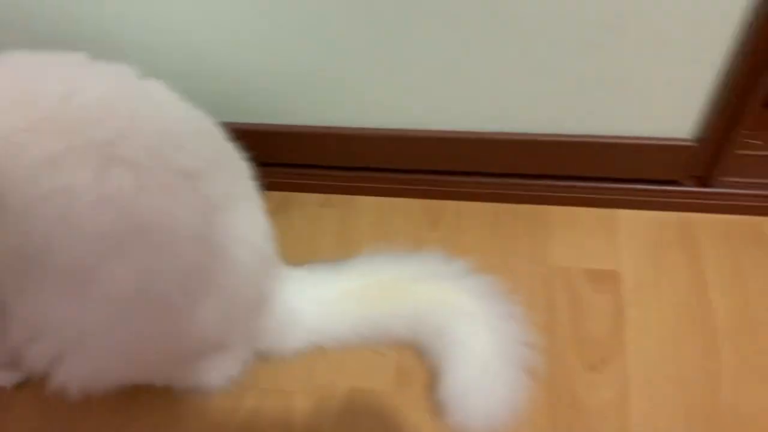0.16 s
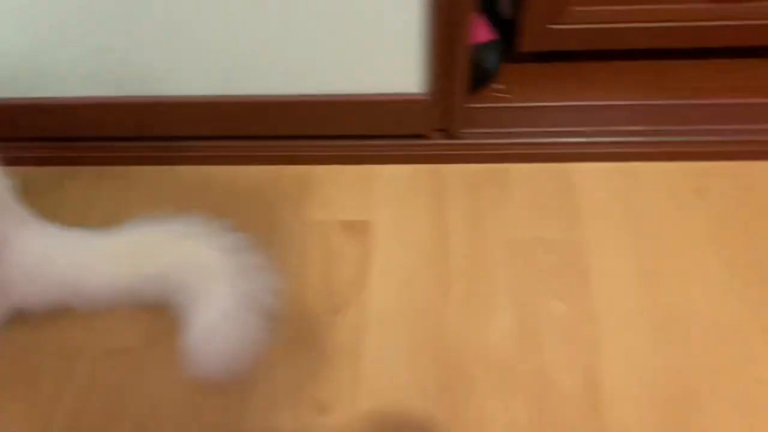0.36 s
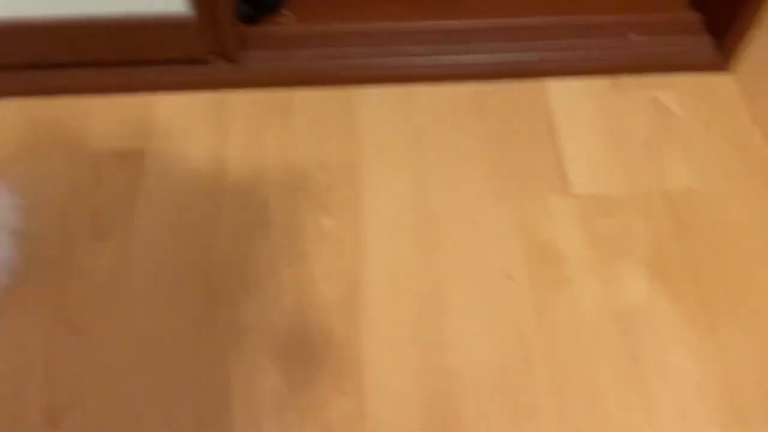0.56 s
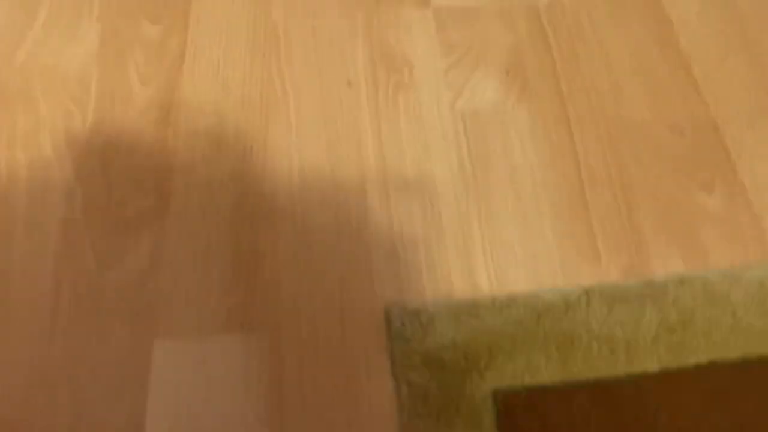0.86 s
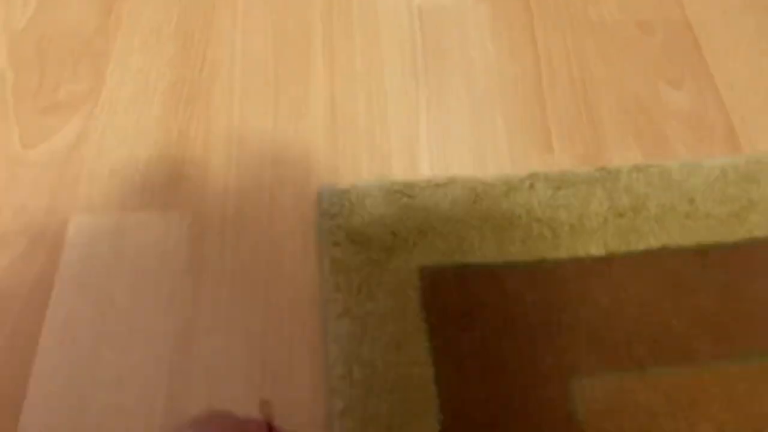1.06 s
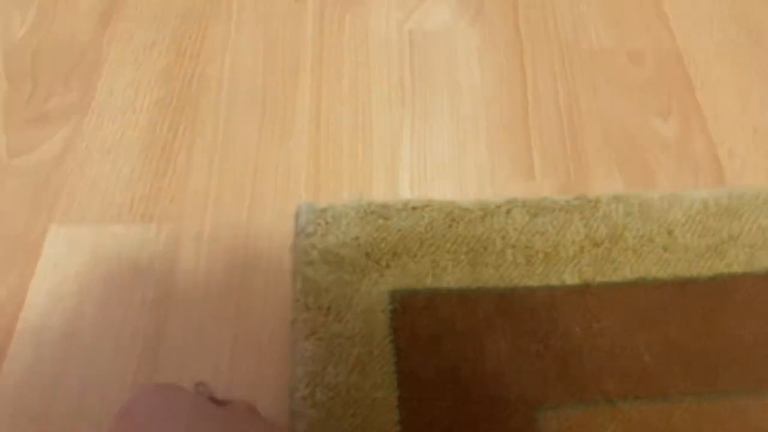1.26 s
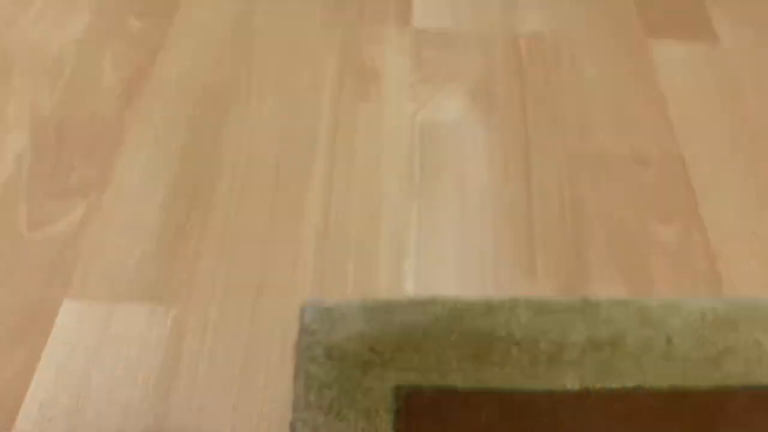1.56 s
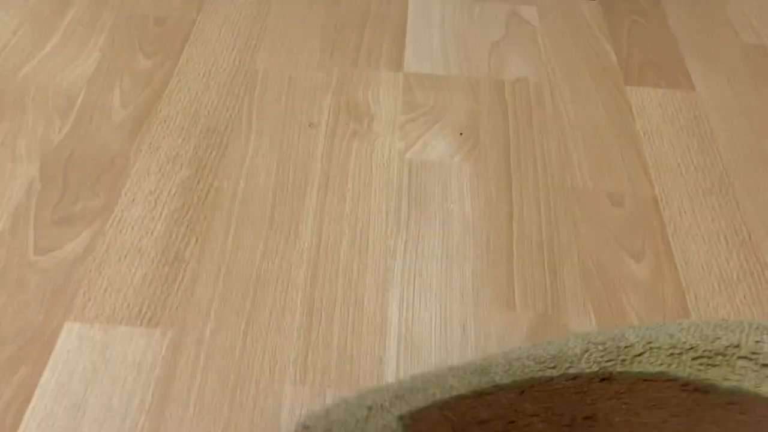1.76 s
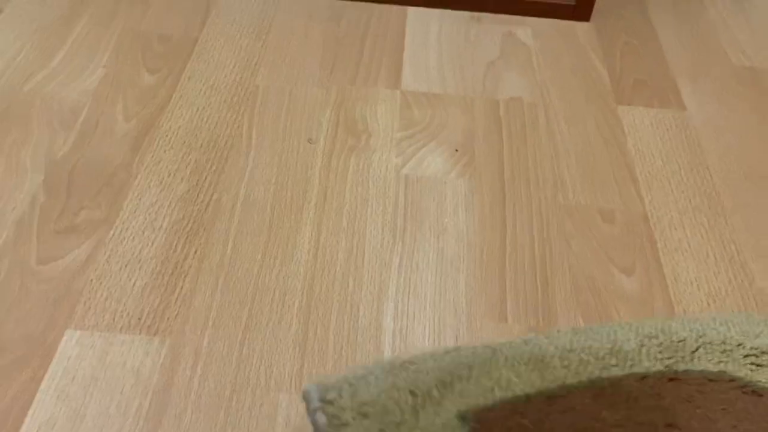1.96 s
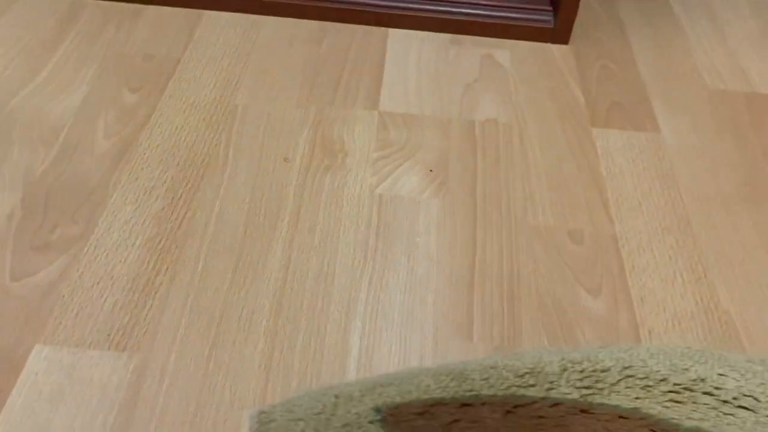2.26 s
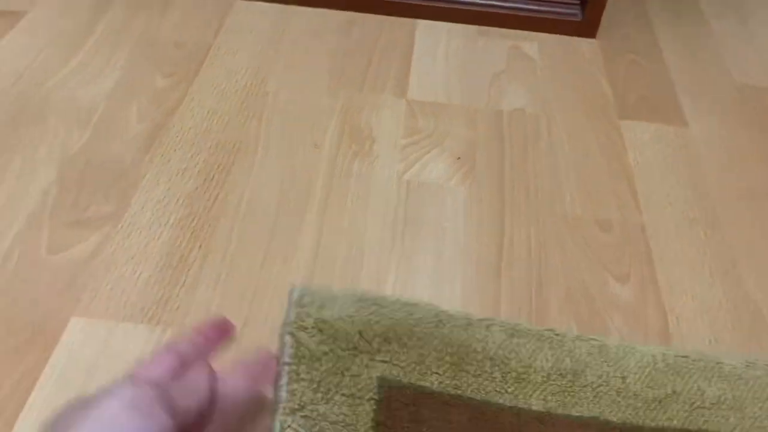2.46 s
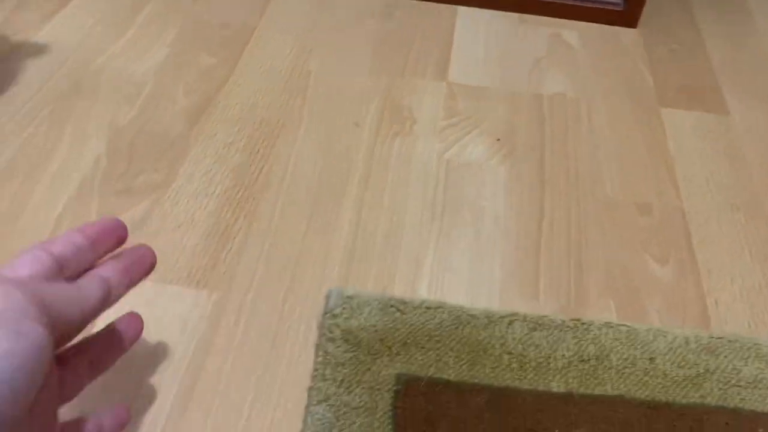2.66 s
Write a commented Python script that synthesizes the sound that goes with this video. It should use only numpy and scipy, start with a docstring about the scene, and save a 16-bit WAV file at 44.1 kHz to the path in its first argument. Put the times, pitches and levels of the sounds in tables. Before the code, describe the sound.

A small metal pin clicks on a laminate floor, amid soft low footfalls, cloth rustle and light board taps; later it bounces in a quick cluster before one dull thump, close microphone, small quiet room.

```python
"""Cloth rustles and soft footfalls thud near the microphone in a small room, with board taps and a foot scuff.
A small metal pin is batted about on a laminate floor: it clicks, bounces and skitters; one dull thump comes late.
Each contact bends the boards, which answer with a short falling chirp: bending waves carry treble fastest.
Clicks, cloth and air are shaped noise, footfalls are slow pulses, rings are decaying sines;
the room adds diffuse echoes that die at a different rate in each band."""
import sys
import numpy as np
from scipy import signal
from scipy.fft import rfft, irfft, next_fast_len
from scipy.io import wavfile

SR = 44100
rng = np.random.default_rng(int(sys.argv[2]) if len(sys.argv) > 2 else 0)


def dump(signal):
    """Clip the signal to [-1, 1] and save it as 16-bit WAV at the path in sys.argv[1]."""
    limited = np.clip(np.atleast_2d(signal).T, -1, 1)
    pcm = np.round(limited * 32767).astype(np.int16)
    wavfile.write(sys.argv[1], SR, pcm)


N = 123479  # length in samples
TIME = np.arange(N) / SR  # s from the start of the scene
AGE = np.arange(int(.25 * SR)) / SR  # s from the onset of one contact

# Rustle of clothing. Each row: time in seconds, level in dB before the grain.
RUSTLE_LEVEL = [(0, -70.5), (0.2, -72.5), (0.42, -82.5), (0.435, -59), (0.54, -65), (0.61, -53),
                (0.69, -81), (0.85, -67.5), (1.05, -65.5), (1.25, -84.5), (1.44, -61), (1.52, -66),
                (1.6, -55), (1.69, -64.5), (1.74, -75.5), (1.775, -65), (1.81, -79), (1.87, -77.5),
                (1.92, -60), (2.0, -63.5), (2.07, -55.5), (2.3, -59), (2.41, -62), (2.46, -74), (2.68, -83),
                (2.73, -72), (2.8, -66.5)]
# Spectrum of the cloth hiss. Each row: frequency in Hz, relative level in dB.
RUSTLE_COLOUR = [(100, -14.5), (300, -3), (700, 2), (1300, -2.5), (2400, -2), (4000, -4), (6500, -5.5),
                 (8500, -7.5), (11000, -8.5), (16000, -13)]
RUSTLE_GRAIN_DB, RUSTLE_GRAIN_S = 2.5, 0.0048  # spread and spacing of the random level points

# Spectrum of the still air. Each row: frequency in Hz, relative level in dB.
AIR_COLOUR = [(30, 0.5), (120, 15), (500, 7.5), (1000, -31.5), (3000, -27.5), (8000, -15.5), (16000, -58.5)]
AIR_DB = -81

# Footfalls carried by the floor. Each row: start in seconds, level in dB, frequency in Hz, time to peak in seconds.
FOOTFALLS = [(0.172, -33.5, 63.2, 0.033), (0.191, -50.5, 153, 0.01), (0.323, -41.5, 146, 0.0051),
             (0.325, -32.5, 67, 0.021), (0.376, -38.5, 56.4, 0.021), (0.426, -38, 51, 0.019),
             (0.479, -40, 52, 0.032), (0.628, -40.5, 60, 0.016), (0.699, -44.5, 62.6, .018),
             (0.817, -37.5, 59, 0.016), (0.899, -42, 62, 0.019), (2.372, -40.5, 75.5, 0.013),
             (2.503, -33.5, 89.5, 0.0068)]
# Low rumble of movement. Each row: time in seconds, level in dB.
RUMBLE_LEVEL = [(0, -61), (0.3, -57.5), (0.5, -59), (0.9, -59.5), (1.2, -62.5), (1.55, -72.5),
                (1.85, -77.5), (2.3, -71), (2.48, -65), (2.53, -51), (2.62, -61), (2.8, -66)]
# Spectrum of the rumble. Each row: frequency in Hz, relative level in dB.
RUMBLE_COLOUR = [(20, -21.5), (35, -9), (55, -1.5), (85, -2), (130, -1), (200, -15.5), (400, -26.5),
                 (700, -31.5), (1500, -66.5)]

# Dull taps and creaks of the boards. Each row: start in seconds, knock level in dB, pitch factor, click level in dB.
BOARD_TAPS = [(0.034, -50.5, 0.81, -88), (0.704, -53.5, 0.84, -75), (0.772, -56.5, 0.88, -68.5),
              (0.8863, -32.5, 0.92, -52.5), (0.9072, -30.5, 1, -53.5), (0.920, -41, 0.86, -69),
              (1.095, -39.5, 0.73, -83), (1.0995, -41, 0.75, -84), (1.118, -36.5, 0.97, -88),
              (1.131, -37, 0.8, -84), (1.138, -43, 0.77, -85), (1.150, -43, 0.88, -84),
              (1.160, -40.5, 0.92, -83), (1.174, -41.5, 0.915, -78), (1.184, -47, 0.81, -82),
              (1.1935, -38.5, 0.863, -80), (1.296, -55.5, 1.13, -82), (1.301, -51, 0.41, -71.5),
              (1.390, -47.5, 0.95, -82), (1.4225, -40, 1.284, -61), (2.366, -45, 1.08, -80),
              (2.371, -41.5, 1.09, -76), (2.471, -71, 1.3, -56), (2.482, -43, 1, -51.5),
              (2.489, -42, 0.83, -56), (2.698, -55, 0.79, -87)]
# The board's chirp at pitch factor 1: start and end frequency, time constant of the glide, duration.
CHIRP_START_HZ, CHIRP_END_HZ, CHIRP_GLIDE_S, KNOCK_S = 1227, 429.6, .0017, 0.0064
KNOCK_PAN_DB, LEFT_LEAD_S = 4.5, .00008  # left over right; the left also comes earlier

# Envelope of a click, and how alike its two channels are (0 to 1).
CLICK_RISE_S, CLICK_HOLD_S, CLICK_FALL_S, CLICK_LIKENESS = .0003, .0032, .0017, .75

# Spectrum of a foot brushing the floor. Each row: frequency in Hz, relative level in dB.
SCUFF_COLOUR = [(400, -19), (1300, -16), (2600, -4.5), (4300, -2.5), (6300, -9), (8000, -18), (11000, -19),
                (16000, -21)]
SCUFF_PEAK_S, SCUFF_DB, SCUFF_RISE_S, SCUFF_FALL_S = 0.23, -44.5, 0.019, 0.017

# Small creaks and crackles under the moving weight. Each row: time in seconds, level in dB.
CRACKLE_LEVEL = [(0.4, -111), (0.43, -63), (0.54, -72.5), (0.57, -59.5), (0.62, -55.5), (0.68, -73.5),
                 (0.8, -67), (1.05, -68), (1.11, -59.5), (1.19, -65), (1.24, -78), (1.36, -78), (1.43, -55),
                 (1.47, -89), (1.55, -97)]
# Spectrum of the crackle. Each row: frequency in Hz, relative level in dB.
CRACKLE_COLOUR = [(150, -9), (400, 8.5), (750, 3.5), (1200, 0.5), (1700, -11.5), (2400, -7.5),
                  (4000, -20.5), (8000, -49), (16000, -52.5)]
CRACKLE_PER_S, CRACKLE_SPREAD_DB = 500, -1  # mean slip rate; scale of the random weakening

# The pin hits the floor. Each row: start in seconds, board knock level in dB, click level in dB,
# top sizzle level in dB, woody crack level in dB.
PIN_HITS = [(0.969, -34.5, -36.5, -38, -38), (2.0739, -26, -29.5, -30.5, -54.5),
            (2.076, -23.5, -24, -42, -47.5), (2.0907, -35.5, -42.5, -52, -69),
            (2.1104, -27, -37, -39.5, -67.5), (2.2075, -38, -39, -38, -54),
            (2.2130, -31, -38, -36.5, -44.5), (2.2706, -39, -49.5, -51, -53),
            (2.2782, -38.5, -47.5, -48.5, -69)]
# Faint ringing of the pin. Each row: frequency in Hz, level against the click in dB, 60 dB decay time in seconds.
PIN_MODES = [(2845, -19, .06), (3160, -18, .06), (3460, -15, .055), (3700, -15, .07), (4500, -21, .08),
             (5121, -20, .08), (5286, -19, .08), (5425, -15, .06), (5515, -17, .06), (5777, -16, .08)]
# Spectrum of the pin's click. Each row: frequency in Hz, relative level in dB.
PIN_CLICK_COLOUR = [(500, -26.5), (1200, -14.5), (2000, -6), (2800, 0), (3600, 6), (4400, 0), (5600, 2),
                    (6600, -1), (8000, -2), (11000, -18), (16000, -36)]
# Spectrum of the pin's top sizzle. Each row: frequency in Hz, relative level in dB.
SIZZLE_COLOUR = [(2000, -23.5), (5000, -15.5), (7700, -2.5), (11000, 2), (12300, -4), (15000, -1),
                 (16000, -13)]
# Spectrum of a woody crack, also the grit of the scrape. Each row: frequency in Hz, relative level in dB.
CRACK_COLOUR = [(300, -14), (900, 5), (1400, 4), (2500, -2.5), (3600, -1), (4800, -18), (7500, -21),
                (11000, -33), (16000, -41.5)]
SIZZLE_LIKENESS = 0.13

# A gritty scrape that swells and stops; its levels are those reached at the end.
SCRAPE_START_S, SCRAPE_END_S, SCRAPE_PER_S = 1.402, 1.439, 260
SCRAPE_KNOCK_DB, SCRAPE_GRIT_DB, SCRAPE_SWELL_DB = -41.5, -47, 15
SCRAPE_PITCH = 1.36  # middle pitch factor
SCRAPE_RING_S, SCRAPE_RING_DB, SCRAPE_RING_HZ, SCRAPE_RING_T60_S = 1.423, -51, 572, .17

# Ticks of a light snap. Each row: start in seconds, level in dB.
SNAP_TICKS = [(1.8815, -42.5), (1.8849, -36.5)]
# Spectrum of the snap, also the click of a board tap. Each row: frequency in Hz, relative level in dB.
SNAP_COLOUR = [(300, 1.5), (1600, 1.5), (2700, 3), (6300, -2.5), (8000, -12), (11000, -9), (16000, -20.5)]
SNAP_FALL_S, POCK_DB, POCK_HZ, POCK_RISE_S, POCK_T60_S = 0.0016, -31.5, 319.6, 0.0052, 0.045

# Ring of the floor under the thump. Each row: frequency in Hz, level in dB, 60 dB decay time in seconds.
FLOOR_MODES = [(124, -36, 0.16), (219, -37, 0.1), (265.6, -23.5, 0.052), (515.6, -33, 0.097),
               (657.5, -40.5, 0.19)]
THUMP_S, THUMP_DB, THUMP_CRACK_DB = 2.4968, -17, -36.5
THUMP_START_HZ, THUMP_END_HZ, THUMP_GLIDE_S = 970, 277, 0.00318
THUMP_RISE_S, THUMP_FALL_S = 0.0025, 0.0024

# Echoes of the room. Each row: frequency in Hz, echo level in dB, 60 dB decay time in seconds.
ROOM_BANDS = [(99, -14.5, .4), (250, -10, 0.29), (522, -7.5, 0.2), (1100, -9, 0.22), (2480, -5, 0.17),
              (5030, -5, 0.2), (8100, -7, 0.19), (14000, -7.5, 0.21)]
ROOM_DELAY_S, ROOM_BUILD_S, ROOM_LIKENESS = 0.0031, 0.006, 0.53

# Dips of the microphone, each applied twice. Each row: frequency in Hz, width of one pass in Hz.
NOTCHES = [(9120, 1430), (13220, 1210)]
CUTOFF_HZ = 16200


def from_db(db):
    """Level to amplitude: 20 dB is a factor of ten."""
    return 10 ** (np.asarray(db) / 20)


def level(rows):
    """Amplitude envelope by interpolating (s, dB) rows."""
    return from_db(np.interp(TIME, *np.transpose(rows)))


def pan(x, pan_db):
    """Localisation by level and time difference: louder and a little earlier on the left."""
    i = np.arange(len(x))
    right = np.interp(i - LEFT_LEAD_S * SR, i, x)
    return np.array([x, right]) * from_db([[pan_db / 2], [-pan_db / 2]])


def add(out, s, x):
    """Superposition: mix a sound in at s seconds."""
    i = int(s * SR)
    out[:, i:i + x.shape[-1]] += x[..., :N - i]


def pair(likeness, size):
    """Interchannel correlation: white stereo noise from a shared mid and an opposed side."""
    mid, side = rng.standard_normal((2, size))
    c = np.clip(likeness, 0, 1)
    opposed = side * np.array([[1], [-1]])
    return np.sqrt((1 + c) / 2) * mid + np.sqrt((1 - c) / 2) * opposed


def filtered(x, colour):
    """Linear filtering: weight the spectrum by a colour read on a log-frequency axis."""
    n = x.shape[-1]
    hz = np.fft.rfftfreq(n, 1 / SR)
    points = np.array(colour)
    gain_db = np.interp(np.log(hz + 1), np.log(points[:, 0]), points[:, 1])
    return irfft(rfft(x) * from_db(gain_db), n)


def noise(colour, likeness, size):
    """Spectral shaping: coloured stereo noise of rms 1."""
    x = filtered(pair(likeness, next_fast_len(size)), colour)[:, :size]
    return x / x.std()


def burst(colour, hold_s, fall_s, likeness=0.37):
    """Impact noise: a rise, a brief rattle and exponential decay, with energy set by the envelope."""
    shape = np.minimum(AGE / CLICK_RISE_S, 1) * np.exp(-np.maximum(AGE - hold_s, 0) / fall_s)
    x = noise(colour, likeness, size=len(AGE)) * shape
    return x * np.sqrt(2 * np.sum(shape ** 2) / np.sum(x ** 2))


def click(colour, likeness=CLICK_LIKENESS):
    """Hard contact: a brief force excites a wide band."""
    return burst(colour, CLICK_HOLD_S, CLICK_FALL_S, likeness)


def chirp(start_hz, end_hz, glide_s):
    """Bending-wave dispersion: treble arrives first, so a sine glides down and settles."""
    hz = end_hz + (start_hz - end_hz) * np.exp(-AGE / glide_s)
    return np.sin(2 * np.pi * np.cumsum(hz) / SR)


def ring(hz, t60):
    """Damped mode: a sine that loses 60 dB in t60 seconds."""
    return np.sin(2 * np.pi * hz * AGE) * np.exp(-np.log(1000) * AGE / t60)


def swell(hz, rise_s):
    """Soft contact: a slow push gives a low tone that grows, peaks at rise_s and fades."""
    u = (AGE / rise_s) ** 2
    return np.sin(2 * np.pi * hz * AGE) * u * np.exp(1 - u)


def knock(pitch):
    """Plate impact: a struck board answers with one short falling chirp."""
    shape = np.abs(np.sin(np.pi * np.minimum(AGE / KNOCK_S, 1))) ** 1.5
    return pan(shape * chirp(pitch * CHIRP_START_HZ, pitch * CHIRP_END_HZ, CHIRP_GLIDE_S), KNOCK_PAN_DB)


def rustle():
    """Sliding friction: cloth hisses with a fine, uneven grain."""
    grain = np.interp(TIME / RUSTLE_GRAIN_S, np.arange(N), rng.standard_normal(N))
    hiss = noise(RUSTLE_COLOUR, likeness=.25, size=N)
    return level(RUSTLE_LEVEL) * from_db(RUSTLE_GRAIN_DB * grain) * hiss


def still_air():
    """Background noise: a steady, faint random pressure, the same in both channels."""
    return from_db(AIR_DB) * noise(AIR_COLOUR, likeness=1.0, size=N)


def footfalls():
    """Structure-borne sound: low thuds carried by the floor, over a rumble of movement."""
    out = level(RUMBLE_LEVEL) * noise(RUMBLE_COLOUR, likeness=0.71, size=N)
    for s, db, hz, rise_s in FOOTFALLS:
        add(out, s, from_db(db) * swell(hz, rise_s))
    return out


def taps():
    """Soft impact: contacts excite mostly the board and little click."""
    out = np.zeros((2, N))
    for s, knock_db, pitch, click_db in BOARD_TAPS:
        add(out, s, from_db(knock_db) * knock(pitch) + from_db(click_db) * click(SNAP_COLOUR))
    return out


def scuff():
    """Brushing friction: one stroke of noise that swells and trails off."""
    late = TIME - SCUFF_PEAK_S
    rise = (np.minimum(late, 0) / SCUFF_RISE_S) ** 2 / 2
    fall = np.maximum(late, 0) / SCUFF_FALL_S
    return from_db(SCUFF_DB) * np.exp(-rise - fall) * noise(SCUFF_COLOUR, likeness=0.56, size=N)


def crackle():
    """Stick-slip: tiny releases at random times, of random sign and uneven size."""
    happens = rng.random(N) < CRACKLE_PER_S / SR
    size = from_db(CRACKLE_SPREAD_DB * np.minimum(rng.exponential(1, N), 3))
    x = filtered(happens * rng.choice([-1, 1], N) * size, CRACKLE_COLOUR)
    return pan(level(CRACKLE_LEVEL) * x / x.std(), pan_db=3.5)


def pin():
    """Impact excitation: each hit knocks the board, clicks and sets the pin's modes ringing briefly."""
    out = np.zeros((2, N))
    for s, knock_db, click_db, sizzle_db, crack_db in PIN_HITS:
        rings = sum(from_db(db) * rng.choice([-1, 1]) * ring(hz, t60) for hz, db, t60 in PIN_MODES)
        metal = from_db(click_db) * (click(PIN_CLICK_COLOUR) + rings)
        sizzle = from_db(sizzle_db) * click(SIZZLE_COLOUR, SIZZLE_LIKENESS)
        wood = from_db(knock_db) * knock(1) + from_db(crack_db) * click(CRACK_COLOUR)
        add(out, s, metal + sizzle + wood)
    return out


def scrape():
    """Stick-slip: uneven slips grow stronger until the motion stops; a faint tone rings on."""
    out = np.zeros((2, N))
    add(out, SCRAPE_RING_S, from_db(SCRAPE_RING_DB) * ring(SCRAPE_RING_HZ, SCRAPE_RING_T60_S))
    slips = np.arange(SCRAPE_START_S, SCRAPE_END_S, 1 / SCRAPE_PER_S)
    for s, (late, bend) in zip(slips, rng.normal(0, 1, (len(slips), 2))):
        gain = from_db(SCRAPE_SWELL_DB * (s - SCRAPE_END_S) / (SCRAPE_END_S - SCRAPE_START_S))
        board = from_db(SCRAPE_KNOCK_DB) * knock(SCRAPE_PITCH * np.exp(0.155 * bend))
        grit = from_db(SCRAPE_GRIT_DB) * click(CRACK_COLOUR)
        add(out, s + 0.00107 * late, gain * (board + grit))  # timing scatter in s
    return out


def snap():
    """Impulse and resonance: two dry ticks close by, the second with a hollow, decaying pock."""
    out = np.zeros((2, N))
    for s, db in SNAP_TICKS:
        add(out, s, from_db(db) * burst(SNAP_COLOUR, hold_s=0.00059, fall_s=SNAP_FALL_S))
    pock = ring(POCK_HZ, POCK_T60_S) * np.minimum(AGE / POCK_RISE_S, 1)
    add(out, SNAP_TICKS[-1][0], from_db(POCK_DB) * pock)
    return out


def thump():
    """Heavy impact: a longer, deeper bending chirp, a dull crack and the floor's boom."""
    out = np.zeros((2, N))
    rise = np.sqrt(np.minimum(AGE / THUMP_RISE_S, 1))
    fall = np.exp(-np.maximum(AGE - 2 * THUMP_RISE_S, 0) / THUMP_FALL_S)
    body = from_db(THUMP_DB) * rise * fall * chirp(THUMP_START_HZ, THUMP_END_HZ, THUMP_GLIDE_S)
    boom = sum(from_db(db) * ring(hz, t60) for hz, db, t60 in FLOOR_MODES)
    boom = boom * np.minimum(AGE / (2 * THUMP_RISE_S), 1)
    crack = from_db(THUMP_CRACK_DB) * burst(CRACK_COLOUR, hold_s=0.0077, fall_s=0.0042)
    add(out, THUMP_S, pan(body + boom, pan_db=2.5) + crack)
    return out


def room(x):
    """Reverberation: diffuse echoes build up quickly and die exponentially, band by band."""
    t = np.arange(SR // 2) / SR
    hz = np.fft.rfftfreq(len(t), 1 / SR)
    centres = np.log(np.array(ROOM_BANDS)[:, 0])
    white, tail = rfft(pair(ROOM_LIKENESS, size=len(t))), 0
    build = np.clip((t - ROOM_DELAY_S) / ROOM_BUILD_S, 0, 1)
    for (_, db, t60), own in zip(ROOM_BANDS, np.eye(len(ROOM_BANDS))):
        share = np.interp(np.log(hz + 1), centres, own)  # bands overlap as triangles
        shape = build * np.exp(-np.log(1000) * t / t60)
        tail = tail + from_db(db) * irfft(white * share, len(t)) * shape / np.linalg.norm(shape)
    return signal.fftconvolve(x, tail, axes=1)[:, :N]


def scene():
    """Direct and reverberant sound: contacts excite the room; cloth, air and footfalls stay dry."""
    background = rustle() + still_air() + footfalls()
    soft = taps() + crackle()
    hits = scuff() + pin() + scrape()
    near, blow = snap(), thump()
    to_room = hits + from_db(-1.5) * soft + from_db(-2) * blow + from_db(-5.5) * near
    return background + soft + hits + near + blow + room(to_room)


def record(dry):
    """Microphone response: the deepest bass is lost, the treble has two narrow dips and the top is cut."""
    dry = signal.sosfilt(signal.butter(2, 28, "high", fs=SR, output="sos"), dry)
    for hz, width_hz in NOTCHES:
        b, a = signal.iirnotch(hz, hz / width_hz, fs=SR)
        dry = signal.lfilter(b, a, signal.lfilter(b, a, dry))
    return signal.sosfilt(signal.ellip(10, .2, 80, CUTOFF_HZ, fs=SR, output="sos"), dry)


dry = scene()
out = record(dry)
dump(out)
```